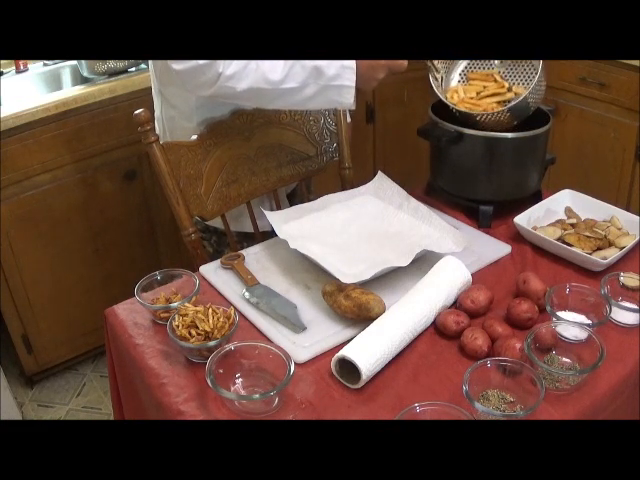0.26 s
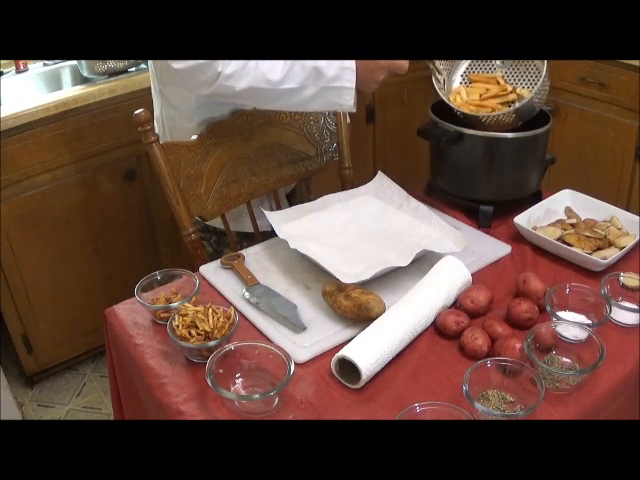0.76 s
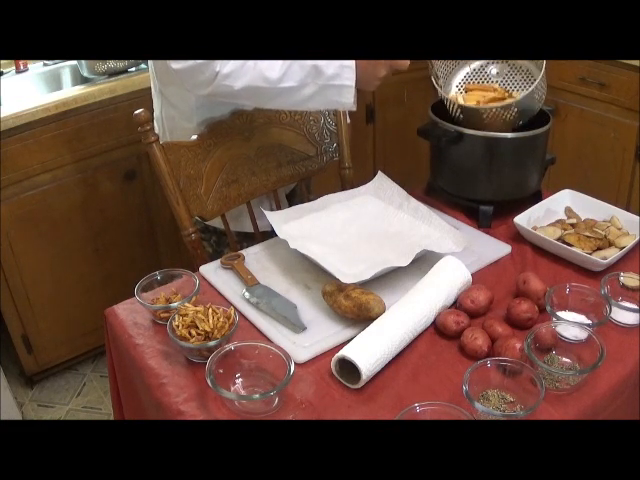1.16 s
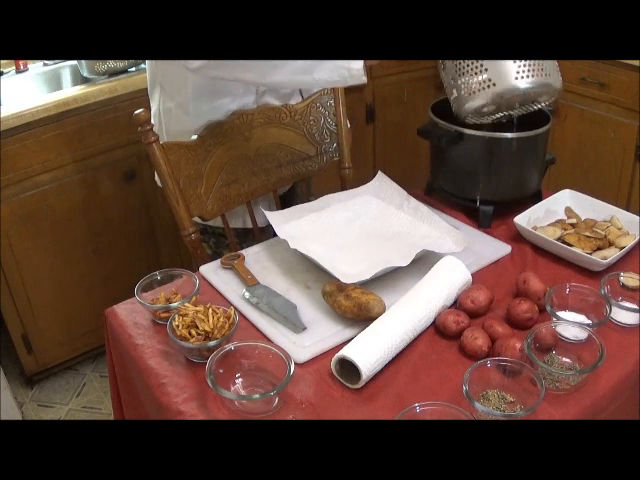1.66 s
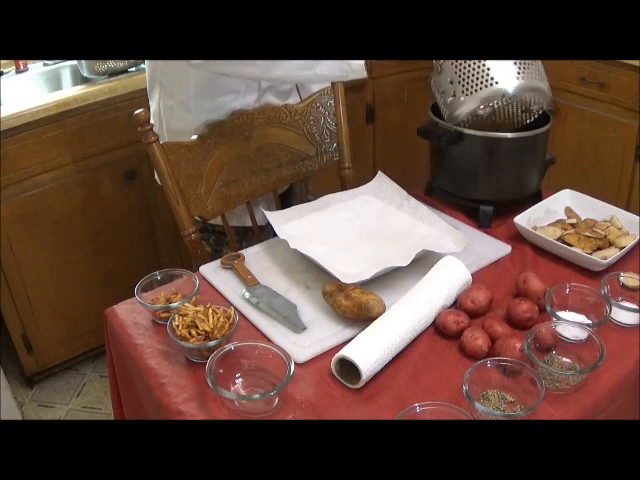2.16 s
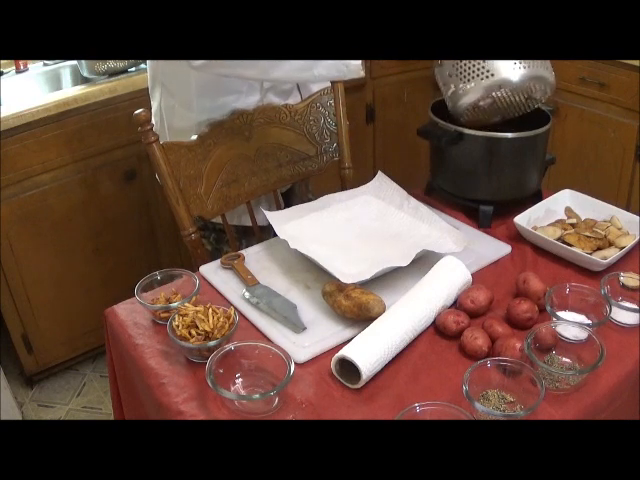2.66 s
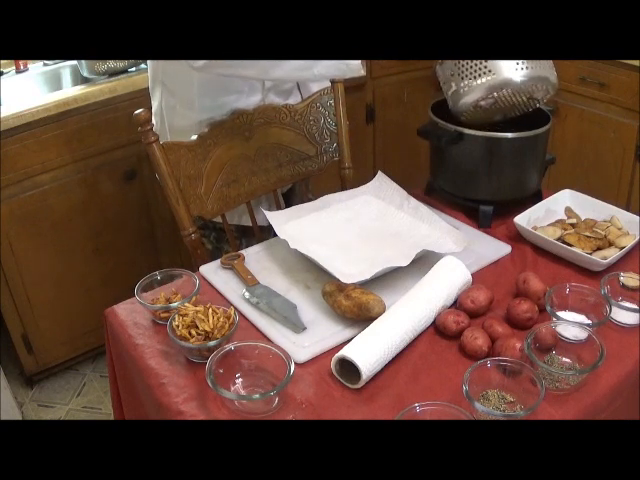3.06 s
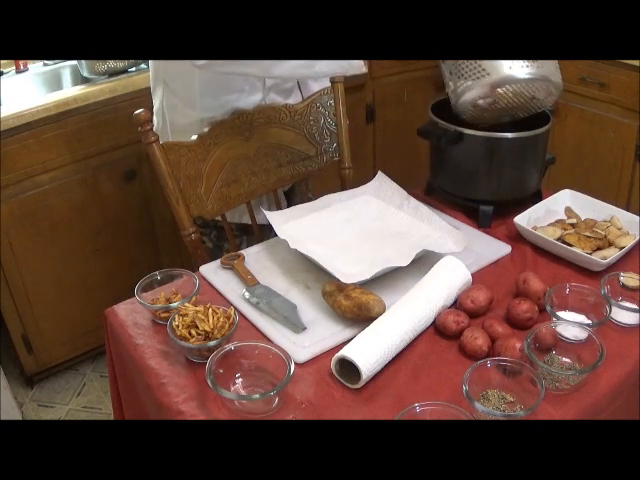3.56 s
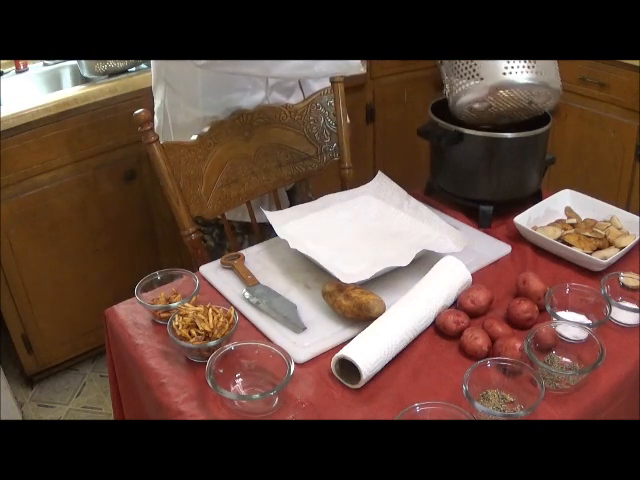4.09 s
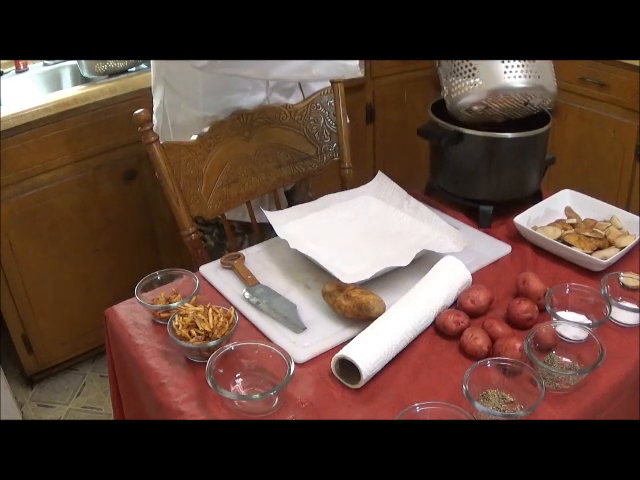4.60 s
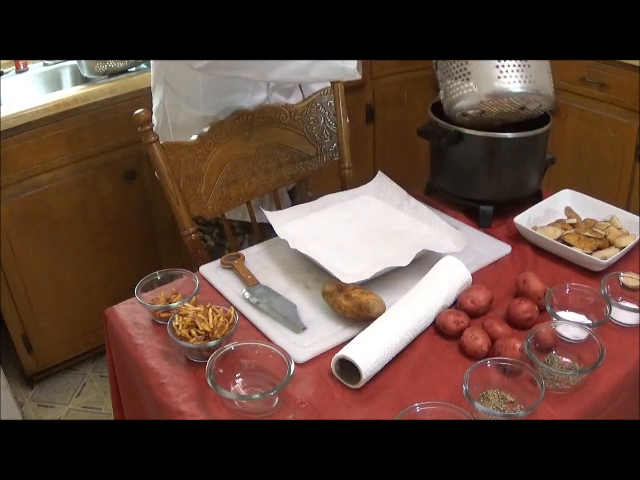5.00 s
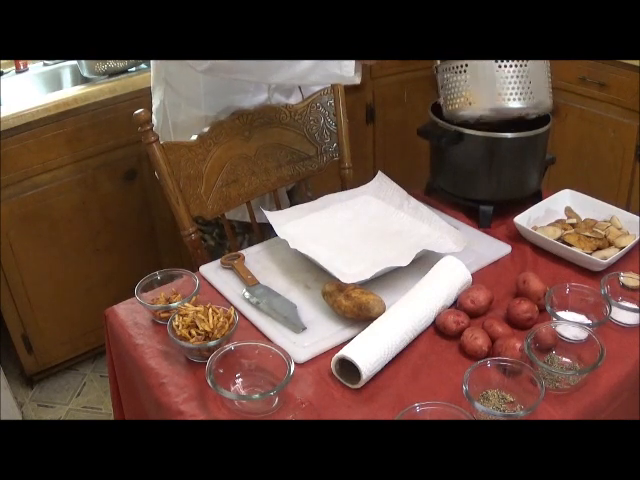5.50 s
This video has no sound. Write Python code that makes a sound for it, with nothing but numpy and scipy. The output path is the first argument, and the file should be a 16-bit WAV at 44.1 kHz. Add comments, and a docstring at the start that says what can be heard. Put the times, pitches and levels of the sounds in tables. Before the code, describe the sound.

In a small kitchen, a metal basket is jiggled so that potato pieces click and slide against its wall. After a short lull they pour into a fryer pot with a rasping clatter and a dull boom. Quick, rhythmic shaking follows and grows louder, the metal ringing and scraping, and stops shortly before the end. Faint oil hiss and appliance hum continue underneath, with a little room echo.

```python
"""Cut potatoes rattle in a perforated metal basket, shaken over an electric fryer in a small kitchen.
At each jerk they land on the wall and slide, setting the metal ringing. Near 2 s the load slides out
and tumbles into the booming pot; the nearly empty basket, now ringing more freely, is shaken and
scraped five or six times a second. Behind it are a faint sizzle of oil and a mains buzz."""
import sys
import numpy as np
from scipy import signal
from scipy.fft import rfft, irfft
from scipy.io import wavfile

SR = 44100
rng = np.random.default_rng(int(sys.argv[2]) if len(sys.argv) > 2 else 0)


def unload_wav(signal):
    """Save mono or channel-first audio to the path in sys.argv[1] as 16-bit WAV at rate SR, clipped to [-1, 1]."""
    wavfile.write(
        sys.argv[1],
        SR,
        np.round(np.clip(np.atleast_2d(signal).T, -1, 1) * 32767).astype(np.int16),
    )


N = 253115
TIME = np.arange(N) / SR


def gain_of(db):
    """Decibels to a gain."""
    return 10 ** (np.asarray(db) / 20)


def unit_rms(x):
    """Scales to an rms of 1."""
    return x / np.sqrt(np.mean(x ** 2) + 1e-20)


def curve_at(curve, hz):
    """Reads a curve on a log-frequency axis."""
    freq_hz, value = np.transpose(curve)
    return np.interp(np.log(hz + 1), np.log(freq_hz + 1), value)


def fader(points):
    """Turns (time_s, level_db) points into a gain at every sample, silent outside them."""
    time_s, level_db = np.transpose(points)
    return gain_of(np.interp(TIME, time_s, level_db, left=-120, right=-120))


def add(mix, start_s, sound):
    """Mixes a sound in at start_s."""
    part = mix[max(round(start_s * SR), 0):][:len(sound)]
    part += sound[:len(part)]


def eq(x, curve):
    """Colours a signal with a (freq_hz, gain_db) curve."""
    return irfft(rfft(x) * gain_of(curve_at(curve, np.fft.rfftfreq(len(x), 1 / SR))), len(x))


def grit(samples, per_s, spread_db):
    """A train of tiny contacts, random in time, sign and strength."""
    strength = gain_of(spread_db * np.minimum(rng.exponential(1, samples), 4))
    return unit_rms(strength * rng.choice([-1, 1], samples) * (rng.random(samples) < per_s / SR))


def chatter(hits, per_s, spread_db, size=4096):
    """Hard hits: each is a quickly dying cluster of micro-impacts with its own brightness."""
    force, t = np.zeros(N), np.arange(size) / SR
    octaves = np.log2(np.clip(np.fft.rfftfreq(size, 1 / SR), 700, 12000) / 4000)
    for start_s, level_db, tilt_db, decay_s in hits:
        fade = np.exp(-t / decay_s)
        cluster = grit(size, per_s, spread_db) * fade
        burst = irfft(rfft(cluster) * gain_of(tilt_db * octaves))
        add(force, start_s, gain_of(level_db) * unit_rms(burst) * np.sqrt(np.mean(fade ** 2)))
    return force


def soft_blows(hits, cycles, size=4096):
    """Soft hits: each is a heavily damped swing, lower for a softer contact."""
    force, t = np.zeros(N), np.arange(size) / SR
    for start_s, level_db, hz in hits:
        add(force, start_s, gain_of(level_db) * np.sin(2 * np.pi * hz * t) * np.exp(-hz * t / cycles))
    return force


def vessel(force, tone, modes, ring_db, size=2048):
    """Plays a force through a metal vessel, which answers with a crack and ringing modes."""
    log_gain = np.log(gain_of(curve_at(tone, abs(np.fft.fftfreq(size, 1 / SR)))))
    minimum_phase = np.exp(np.conj(signal.hilbert(log_gain)))
    crack = np.fft.ifft(minimum_phase).real[:size // 2]
    t = np.arange(SR // 2) / SR
    ring = signal.unit_impulse(len(t))
    for hz, peak_db, t60_s in modes:
        damping = np.log(1000) / t60_s
        strength = gain_of(peak_db + ring_db) * 2 * damping / SR
        ring += strength * np.exp(-damping * t) * np.cos(2 * np.pi * hz * t)
    response = signal.fftconvolve(ring, crack)
    return signal.oaconvolve(force, response / np.linalg.norm(response))[:N]


# colour of the room noise: freq_hz, gain_db
ROOM_EQ = [(10, -38), (25, -18), (50, -15), (120, -9.5), (300, -10), (550, -9), (1300, -13.5),
           (2000, -13.5), (3700, -11), (6000, -14.5), (9300, -22), (12500, -26.5), (16000, -24)]
def room_tone():
    """A steady bed of soft noise."""
    return gain_of(-50.5) * unit_rms(eq(rng.standard_normal(N), ROOM_EQ))


# rise and fall of the sizzle: time_s, level_db
SIZZLE_FADER = [(0, -52), (1.3, -55), (1.8, -52), (2.4, -50), (5.4, -55), (5.74, -61)]
# colour of the sizzle: freq_hz, gain_db
SIZZLE_EQ = [(1000, -11), (3500, -16), (7000, -4), (9800, 0.5), (12500, -7.5), (16000, -21.5)]
def sizzle():
    """Hot oil crackles so finely that it blurs into a hiss."""
    return fader(SIZZLE_FADER) * unit_rms(eq(grit(N, per_s=7000, spread_db=3.5), SIZZLE_EQ))


# appliance tones before the swell: pitch_hz, level_db
HUM_TONES = [(160, -65.5), (176, -69), (240, -66), (959, -66.5), (1320, -67)]
# slow swell of those tones: time_s, gain_db
HUM_FADER = [(0, -5), (.7, -4.5), (1.5, -2), (3.5, 0.5), (5.74, 2)]
def appliance_hum():
    """A few pure tones that swell together."""
    tones = sum(gain_of(db) * np.sin(2 * np.pi * (hz * TIME + rng.random())) for hz, db in HUM_TONES)
    return np.sqrt(2) * fader(HUM_FADER) * tones


# resonances that the buzz excites: centre_hz, width_hz, level_db
BUZZ_RESONANCES = [(2520, 100, -66), (2830, 260, -63.5), (4060, 650, -68.5), (4850, 160, -63)]
def mains_buzz(mains_hz=59.99):
    """Two pulses per mains cycle excite a few bright resonances."""
    cycle, harmonics = np.linspace(0, 1, 512), np.arange(1, 48)
    heights = sum(gain_of(db) / (1 + (2 * (2 * mains_hz * harmonics - hz) / width_hz) ** 2)
                  for hz, width_hz, db in BUZZ_RESONANCES)
    phases = 0.66 * rng.standard_normal((len(harmonics), 1))
    pulse = heights @ np.cos(2 * np.pi * harmonics[:, None] * cycle + phases)
    return np.sqrt(2) * np.interp(2 * mains_hz * TIME % 1, cycle, pulse)


# stereo width of diffuse sound: freq_hz, side_gain_db
WIDTH_EQ = [(25, -19), (120, -14.5), (250, -7.5), (600, -9.5), (1100, -6), (4000, -6), (9800, -9),
            (12500, -46.5), (16000, -22)]
def diffuse_side(x, gain_db):
    """Shapes a side channel, widest in the mids."""
    return gain_of(gain_db) * eq(x, WIDTH_EQ)


def background():
    """Room tone and sizzle spread wide, hum and buzz in the centre: (mid, side)."""
    mid, side = (room_tone() + sizzle() for _ in range(2))
    return np.array([mid + appliance_hum() + mains_buzz(), diffuse_side(side, gain_db=2.0)])


# reverb time of the kitchen: freq_hz, t60_s
KITCHEN_DECAY = [(150, 0.44), (700, 0.45), (2000, 0.39), (5000, 0.29), (10000, 0.45), (16000, 0.49)]
def reflections(early_db, early_decay_s, late_db):
    """Quick echoes off pot and table, then the tail of the kitchen."""
    t = np.arange(SR * 3 // 4) / SR
    hz, frame_s, bands = signal.stft(grit(len(t), per_s=5000, spread_db=1), SR, nperseg=256)
    decay = gain_of(-60 * frame_s / curve_at(KITCHEN_DECAY, hz)[:, None])
    tail = signal.istft(bands * decay, SR, nperseg=256)[1][:len(t)]
    tail *= np.clip((t - .003) / 0.0091, 0, 1)  # pre-delay and fade-in
    early = grit(len(t), per_s=5000, spread_db=-0.5) * np.exp(-t / early_decay_s) * (t > .001)
    early = gain_of(early_db) * early / np.linalg.norm(early)
    return early + gain_of(late_db) * tail / np.linalg.norm(tail)


def kitchen(direct, poses=10, sway_hz=3.7):
    """Direct sound in the centre and reflections that change as the basket moves: (mid, side)."""
    wet = np.zeros((2, N))
    for pose in range(poses):
        away = (sway_hz * TIME * poses - pose + 1) % poses - 1
        crossfade = np.cos(np.pi / 2 * np.minimum(abs(away), 1))  # constant power between poses
        for channel in wet:
            echoes = reflections(early_db=-8.0, early_decay_s=0.0076, late_db=-5.5)
            channel += signal.oaconvolve(direct * crossfade, echoes)[:N]
    return np.array([gain_of(-5.5) * direct + wet[0], diffuse_side(wet[1], gain_db=-1.0)])


# dull bumps against the pot: start_s, level_db, pitch_hz
POT_BUMPS = [(0.695, -38, 620), (0.725, -32.5, 640), (1.925, -23.5, 776), (2.047, -36, 675),
             (5.592, -34, 1060), (5.609, -36, 1400)]
# clumps of potato landing in the pot: start_s, level_db
POT_CLUMPS = [(1.899, -18.5), (2.018, -21.5)]
# partials of the boom under a clump: pitch_hz, gain_db
BOOM_PARTIALS = [(650, 0), (397, -8.5), (163.4, -12), (82, -12)]
def pot_thuds(lag_cycles=2.896):
    """Bumps and falling clumps thump the pot; the deeper parts of a boom arrive later."""
    booms = [(start_s + lag_cycles / hz, level_db + gain_db, hz)
             for start_s, level_db in POT_CLUMPS for hz, gain_db in BOOM_PARTIALS]
    return soft_blows(POT_BUMPS + booms, cycles=1.7)


# rasp of the load sliding out: time_s, level_db
POUR_FADER = [(1.888, -33), (1.892, -29), (1.992, -15), (2.036, -19.5), (2.046, -18.5), (2.125, -44),
              (2.24, -75)]
# clashes during the pour: start_s, level_db, tilt_db_per_octave, decay_s
POUR_CLASHES = [(1.8925, -27, 0, 0.0047), (1.928, -23, 1.5, 0.013), (1.9665, -18.5, 6.5, 0.022),
                (1.986, -16.5, 6.5, .017), (2.0434, -15, 2.5, 0.0073), (2.050, -26, -3, .0047)]
# broad tone of the pot: freq_hz, gain_db
POT_EQ = [(20, -56), (60, -21), (150, -17), (350, -10), (650, -11.5), (1200, -2), (2000, -4), (2800, -3),
          (4000, 4), (6300, 0.5), (7700, -2.5), (9800, -3), (12500, -16), (16000, -27)]
# modes of the pot with the basket tipped against it: pitch_hz, peak_db, t60_s
POT_MODES = [(375, -0.5, .085), (646, 2, .13), (762, 8.5, 0.1), (963, 4, 0.058), (1244, 1.5, 0.052),
             (1720, -1, 0.0266), (2395, 4.5, .07), (3265, 9, .04), (3600, -5, 0.1), (3720, 1, 0.084),
             (6150, -1, 0.026)]
def pour():
    """The load rasps over the perforated wall and drops into the pot in clumps."""
    slide = gain_of(-1.5) * grit(N, per_s=7000, spread_db=1.5) * fader(POUR_FADER)
    clashes = gain_of(8.5) * chatter(POUR_CLASHES, per_s=8000, spread_db=-0.5)
    return vessel(slide + clashes + gain_of(9.0) * pot_thuds(), POT_EQ, POT_MODES, ring_db=4.5)


# the rim dragging over the pot: start_s, level_db, pitch_hz, length_s
RIM_SCRAPES = [(0.993, -46, 2640, 0.059), (1.115, -47, 2320, 0.043), (2.187, -38, 970, 0.064),
               (4.399, -26, 3470, .035), (4.586, -28.5, 3190, 0.0308), (5.128, -31.5, 3070, 0.04),
               (5.201, -30.5, 3100, 0.033), (5.298, -34.5, 3134, 0.041)]
def rim_scrapes(width_hz=110):
    """Stick and slip of the rim makes one narrow resonance sing for a moment."""
    out = np.zeros(N)
    for start_s, level_db, pitch_hz, length_s in RIM_SCRAPES:
        slips = grit(round(length_s * SR), per_s=2700, spread_db=5.5)
        pole = np.exp((2j * np.pi * pitch_hz - np.pi * width_hz) / SR)
        ring = signal.lfilter([1], [1, -pole], slips).real
        add(out, start_s, gain_of(level_db) * unit_rms(ring * signal.windows.tukey(len(ring), .25)))
    return out


def ticks(per_s, spread_db, cycles):
    """Crisp pieces flick the wall at eight pitches, each about per_s times a second."""
    t = np.arange(256) / SR
    flicks = (unit_rms(np.sin(2 * np.pi * hz * t) * np.exp(-hz * t / cycles))
              for hz in np.geomspace(1700, 8000, 8))
    return unit_rms(sum(np.convolve(grit(N, per_s, spread_db), flick)[:N] for flick in flicks))


def airborne_dip(hits, dip_db, flight_s):
    """Just before they hit the wall the pieces are in flight, so the rubbing ducks."""
    landings = np.sort([hit[0] for hit in hits] + [np.inf])
    until_s = landings[np.searchsorted(landings, TIME)] - TIME
    return gain_of(-dip_db * np.exp(-(until_s / flight_s) ** 2))


# rocking that keeps a few pieces creeping between jerks: time_s, level_db
CREEP_FADER = [(0, -36), (.15, -54), (.75, -56), (1.1, -53.5), (1.25, -59), (2.45, -55), (2.7, -43.5),
               (3.3, -37.5), (3.7, -32), (4.7, -33), (5.28, -36), (5.45, -60)]
# jerks of the basket, where the loose pieces land together and then slide:
# start_s, landing_db, tilt_db_per_octave, decay_s, rasp_db, rumble_db, slide_s
JERKS = [(0.027, -19, 5, 0.0034, -44.5, -39, 0.12), (0.1924, -17.5, 2, .0054, -41, -38, 0.12),
         (0.3751, -18, -1, 0.0051, -38.5, -39.5, 0.075), (0.5322, -15.5, 0.5, 0.0039, -43, -42.5, 0.129),
         (0.804, -17.5, -.5, 0.0052, -33.5, -38, .11), (0.9779, -23, -1, 0.014, -36.5, -39.5, 0.081),
         (1.104, -21, 1.5, 0.0073, -56.5, -54, 0.02), (2.187, -22, -4.5, 0.016, -41, -30, 0.009),
         (2.3883, -29, -3, 0.015, -46, -41, 0.0142), (2.5035, -19, -3, 0.0033, -39.5, -35.5, 0.33),
         (2.7284, -22.5, 2.5, 0.022, -39, -30, 0.045), (2.792, -17.5, -1, .007, -36, -34, 0.15),
         (2.9693, -18.5, -0.5, 0.006, -33.5, -32, 0.16), (3.1518, -10.5, 0.5, 0.01, -36, -28, 0.2),
         (3.3292, -10.5, 0.5, 0.012, -32.5, -24.5, 0.155), (3.5046, -8.5, 1, 0.0089, -24.5, -24, 0.16),
         (3.693, -12, -2, 0.0076, -23.5, -20.5, 0.19), (3.8719, -9.5, -1, 0.0083, -25, -29.5, 0.16),
         (4.0482, -12, -2.5, 0.0097, -23.5, -23.5, 0.06), (4.2349, -10.5, -1, 0.0056, -23.5, -48, 0.17),
         (4.4038, -7.5, -1, 0.00235, -29, -30, 0.19), (4.587, -14, -1.5, 0.0052, -28.5, -34.5, 0.031),
         (4.799, -8, 1.5, 0.0072, -26, -28.5, .17), (4.9825, -10.5, 1.5, 0.0085, -25.5, -28.5, 0.18),
         (5.1137, -12.5, 5.5, 0.0039, -25, -26, 0.062), (5.2044, -11, -.5, 0.0061, -29, -33.5, 0.11)]
def slide_envelopes(rise_s=.008, slow_db_per_s=14.5, stop_db_per_s=170):
    """After each jerk the pieces slide, slow down and go on creeping: gains of (rasp, rumble)."""
    creep = fader(CREEP_FADER)
    rasp_power, rumble_power = creep ** 2, (gain_of(-4.5) * creep) ** 2
    t = np.arange(SR // 2) / SR
    for start_s, *_, rasp_db, rumble_db, slide_s in JERKS:
        fade_db = slow_db_per_s * t + stop_db_per_s * np.maximum(t - slide_s, 0)
        slide = np.minimum(t / rise_s, 1) * gain_of(-fade_db)
        add(rasp_power, start_s, (gain_of(rasp_db) * slide) ** 2)
        add(rumble_power, start_s, (gain_of(rumble_db) * slide) ** 2)
    return np.sqrt([rasp_power, rumble_power])


# dull colour of soft pieces rolling on the wall: freq_hz, gain_db
RUMBLE_EQ = [(20, -16), (90, -5), (160, -3), (450, -3), (900, 2), (1300, -4.5), (2200, -11.5), (5000, -33)]
def rubbing(hits):
    """Pieces slide along the wall with a gritty rasp and roll with a dull rumble."""
    rasp_gain, rumble_gain = slide_envelopes() * airborne_dip(hits, dip_db=2.5, flight_s=0.014)
    rasp = gain_of(-4.5) * grit(N, per_s=1800, spread_db=4.0)
    rasp += gain_of(-7.5) * ticks(per_s=22, spread_db=3.0, cycles=0.75)
    rumble = unit_rms(eq(grit(N, per_s=900, spread_db=2.5), RUMBLE_EQ))
    return rasp_gain * rasp + gain_of(-9.5) * rumble_gain * rumble


# single pieces hitting the wall hard between jerks: start_s, level_db, tilt_db_per_octave
WALL_CLINKS = [(0.0638, -24, -2), (0.251, -23.5, 0), (0.4317, -26.5, -2), (0.6123, -27, -3),
               (0.6798, -29.5, -2.5), (0.7927, -23.5, 1), (0.8604, -17.5, 4.5), (0.8987, -16.5, 4),
               (0.9228, -12.5, 5), (0.9313, -14, 7.5), (1.0063, -18.5, 3), (1.723, -32.5, -1),
               (1.819, -31.5, -0.5), (1.8619, -26.5, -3), (2.167, -20.5, -3), (2.3068, -27, -2.5),
               (2.6044, -23.5, -3), (2.6834, -27.5, -1), (2.996, -17.5, 1), (3.0574, -17.5, 1.5),
               (3.266, -17.5, -0.5), (3.3532, -15, -1.5), (3.4278, -17, 0.5), (3.4965, -17, -1),
               (3.5252, -17, 3), (3.5664, -13, 5), (3.7087, -14, 1.5), (3.75, -10, 9), (3.9425, -9.5, 0.5),
               (4.0621, -12, 2), (4.147, -16, 5), (4.1889, -15, -1.5), (4.2532, -8, 2.5),
               (4.3582, -13.5, 0.5), (4.4153, -12, 2.5), (4.4374, -10, 1), (4.6294, -17.5, -0.5),
               (4.7636, -17.5, -1.5), (4.8387, -13.5, 3.5), (4.9601, -17.5, -2), (5.1644, -12, 3)]
# heavy pieces knocking dully on the basket: start_s, level_db, pitch_hz
WALL_KNOCKS = [(0.065, -27, 1080), (0.254, -27, 1040), (0.984, -29, 1180), (1.57, -34, 1335),
               (1.863, -35, 800), (2.187, -36, 960), (2.71, -20.5, 830), (2.985, -22, 980),
               (3.164, -19.5, 1000), (3.355, -12, 880), (3.504, -16.5, 1180), (3.623, -20, 1310),
               (3.812, -12, 1360), (4.245, -16.5, 960), (4.424, -21.5, 947), (4.836, -23, 1324),
               (5.019, -20.5, 1200)]
def potatoes(clink_decay_s=0.0062):
    """The force of the load on the basket: rubbing, landings, clinks and knocks."""
    hits = [jerk[:4] for jerk in JERKS] + [(*clink, clink_decay_s) for clink in WALL_CLINKS]
    force = rubbing(hits)
    force += gain_of(-3.0) * chatter(hits, per_s=6500, spread_db=2.0)
    return force + gain_of(1.0) * soft_blows(WALL_KNOCKS, cycles=1.5)


# broad tone of the loaded basket: freq_hz, gain_db
FULL_EQ = [(25, -48), (100, -55), (400, -12.5), (650, -15), (1000, -3.5), (1900, -2), (2600, -1), (4000, 1),
           (6300, 3), (8000, -5.5), (10000, -8), (12500, -21), (16000, -28.5)]
# broad tone of the nearly empty basket: freq_hz, gain_db
EMPTY_EQ = [(25, -30), (130, -17), (400, -16), (700, -11.5), (1000, -3.5), (1900, -4.5), (2800, 0),
            (4000, 3.5), (6300, 2.5), (7700, -3), (9600, -1.5), (12500, -14), (16000, -20.5)]
# ringing modes of the basket: pitch_hz, peak_db, t60_s
BASKET_MODES = [(511, 3.5, 0.1), (729.5, 11, 0.14), (775, 4.5, 0.38), (976.6, 12, .17), (1015, 1, 0.19),
                (1075, 1, 0.052), (1213, 9.5, 0.26), (1268, 3.5, 0.09), (1295, 3, 0.175), (1650, 4, .24),
                (2387, 6, 0.28), (2464, .5, 0.031), (2650, -7, 0.051), (3100, 4, 0.044),
                (3580, -0.5, 0.025), (4937, -5, 0.041), (6305, -7, 0.017)]
def basket(pour_start_s=1.9, pour_length_s=.2):
    """The potatoes set the basket ringing; its modes are muffled until the load slides out."""
    force = potatoes()
    emptied = np.clip((TIME - pour_start_s) / pour_length_s, 0, 1)
    full = vessel(force * (1 - emptied), FULL_EQ, BASKET_MODES, ring_db=-1.5)
    empty = vessel(force * emptied, EMPTY_EQ, BASKET_MODES, ring_db=1.45)
    return full + empty


def scene():
    """The fryer sits in the kitchen, a little left of centre: (left, right)."""
    fryer = basket() + gain_of(-1.0) * rim_scrapes() + pour()
    mid, side = kitchen(fryer) + background()
    # the mids lean left: freq_hz, side_gain_db
    lean = [(100, -50), (250, -36.5), (500, -33.5), (1100, -16), (2200, -19), (4500, -29), (9000, -36)]
    side += eq(mid, lean)
    return np.array([mid + side, mid - side])


def record(dry):
    """A steep high cut at 16.1 kHz."""
    high_cut = signal.firwin(511, 16100, window=("kaiser", 9), fs=SR)
    return signal.oaconvolve(dry, high_cut[None], "same")


dry = scene()
out = record(dry)
unload_wav(out)
```